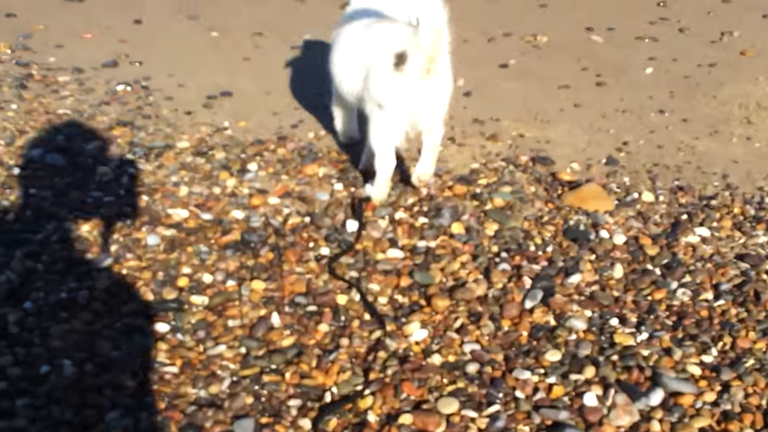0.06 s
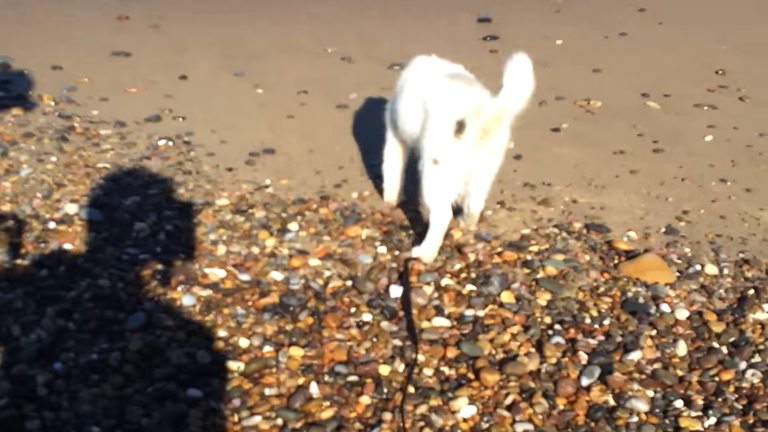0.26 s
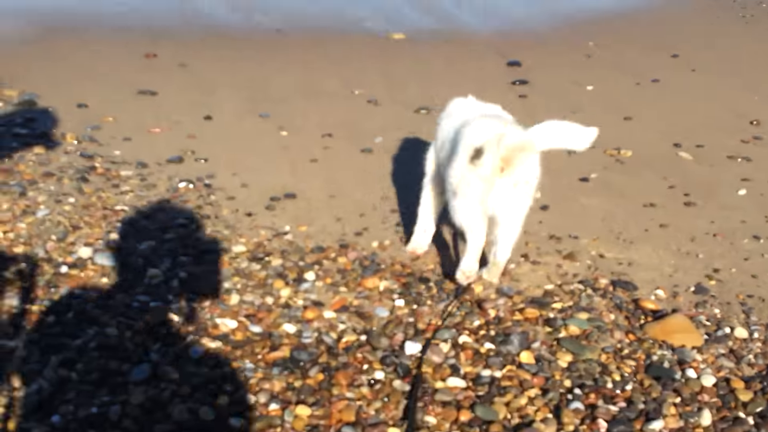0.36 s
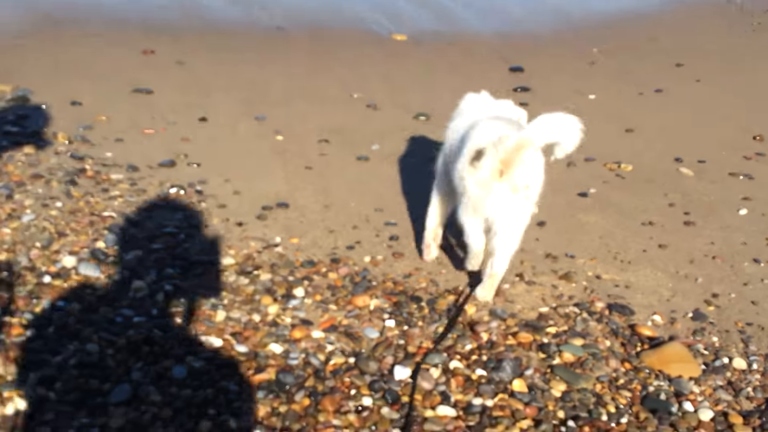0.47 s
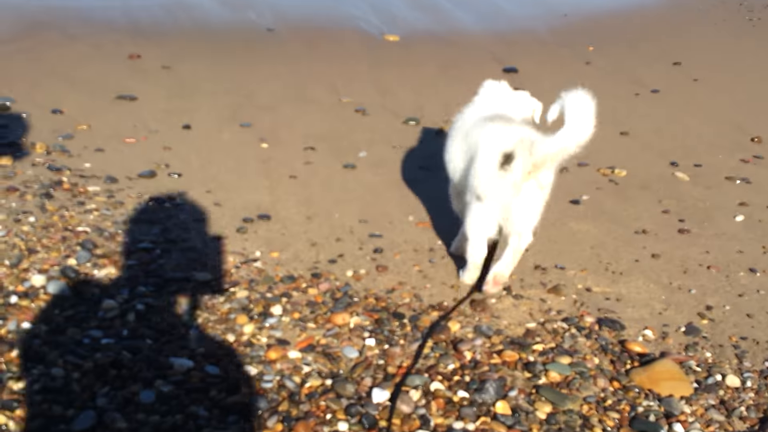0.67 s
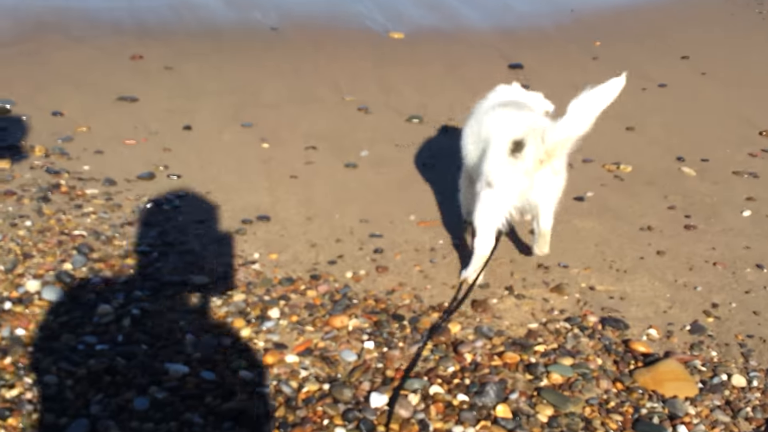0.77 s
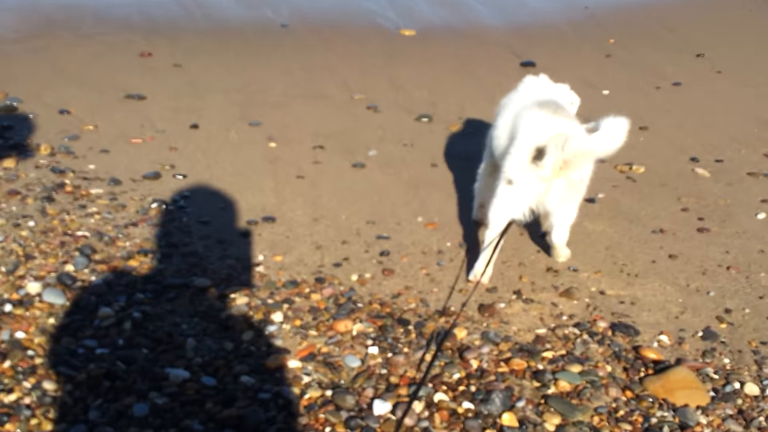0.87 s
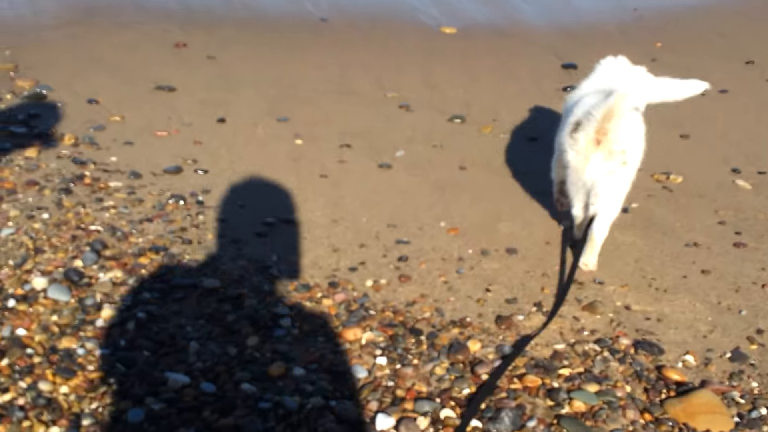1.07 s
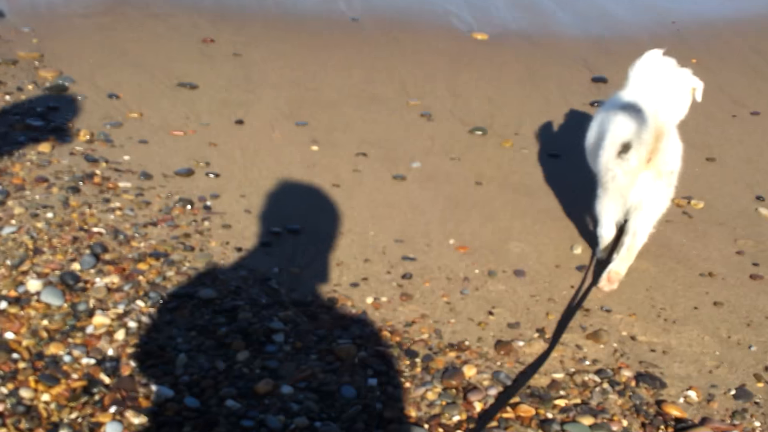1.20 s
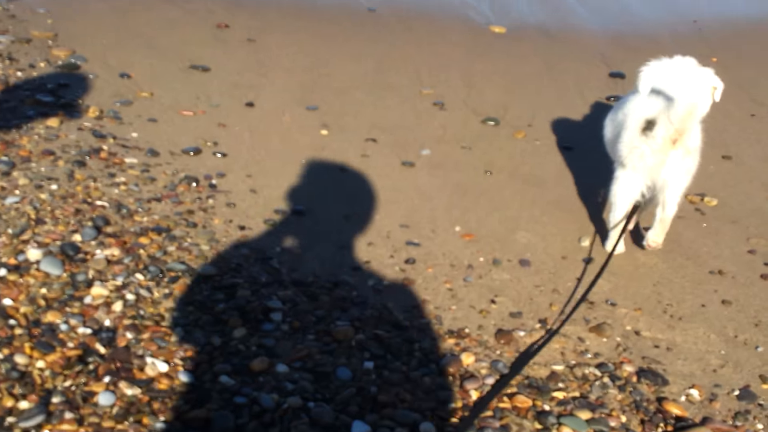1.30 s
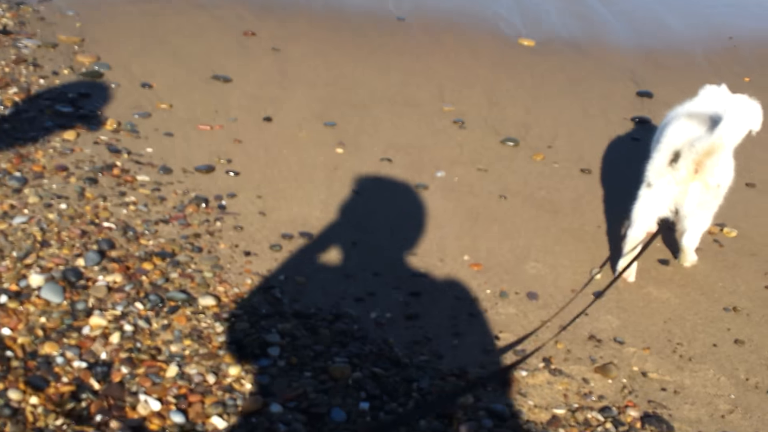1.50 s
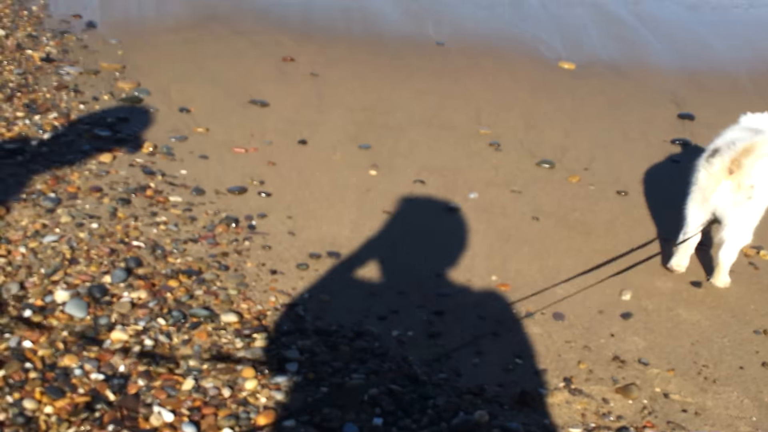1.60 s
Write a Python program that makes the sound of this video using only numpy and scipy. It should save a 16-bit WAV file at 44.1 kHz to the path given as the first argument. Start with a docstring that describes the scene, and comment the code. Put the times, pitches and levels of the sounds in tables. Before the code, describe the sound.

Pebbles crunch and clink under two close steps, over a soft wash of sea.

```python
"""Two crunching footsteps on a pebble beach, close below the listener.
Each step is a few overlapping surges of tiny stone collisions, with a dull thud as the weight lands.
Large stones clack, small pebbles clink, and a sole scuffs through grit.
Behind it the sea rumbles and fizzes, and two faint whines glide up and down."""
import sys
import numpy as np
from scipy import signal
from scipy.fft import rfft, irfft
from scipy.io import wavfile
from scipy.ndimage import uniform_filter1d

SR = 44100
rng = np.random.default_rng(int(sys.argv[2]) if len(sys.argv) > 2 else 0)


def dump_mix(stems):
    """Bounce the given channels to the path in sys.argv[1] as a 16-bit WAV at rate SR."""
    frames = np.atleast_2d(stems).T  # one column per channel
    limited = np.clip(frames, -1, 1)  # hard clip at full scale
    pcm = np.round(limited * 32767).astype(np.int16)
    wavfile.write(sys.argv[1], SR, pcm)


N = 72765
T, FREQS = np.arange(N) / SR, np.fft.rfftfreq(N, 1 / SR)


def amp(db):
    """Turns decibels into a number to multiply by."""
    return 10 ** (np.asarray(db) / 20)


def unit(x):
    """Scales a signal to an average strength (rms) of 1."""
    return x / np.sqrt(np.mean(x ** 2) + 1e-20)


def level_at(points, hz):
    """Looks up a level between the rows of a frequency table."""
    f, db = np.transpose(points)
    return np.interp(np.log(hz + 1), np.log(f + 1), db)


def add(mix, start, sound):
    """Mixes in a stereo sound at a start time in seconds."""
    part = mix[:, max(round(start * SR), 0):][:, :sound.shape[1]]
    part += sound[:, :part.shape[1]]


def colour(x, points, size=4096):
    """Gives a sound the tone in a table, with no ringing ahead of a hit."""
    log_gain = np.log(amp(level_at(points, abs(np.fft.fftfreq(size, 1 / SR)))))
    response = np.exp(np.conj(signal.hilbert(log_gain)))
    taps = np.fft.ifft(response).real[:size // 2]
    return signal.fftconvolve(x, taps[None], axes=1)[:, :x.shape[1]]


def band(x, centre_hz, width_hz):
    """Keeps one soft-edged band of a noise, at strength 1."""
    return unit(irfft(rfft(x) * np.exp(-2 * ((FREQS - centre_hz) / width_hz) ** 2), N))


def drift(hz):
    """A random wobble of strength 1, mostly slower than hz."""
    return unit(irfft(rfft(rng.standard_normal(N)) / (1 + (FREQS / hz) ** 4), N))


def surge(start, rise, hold, fade, db):
    """A loudness curve that builds, holds, then drops 20 dB every `fade` seconds."""
    build = np.clip((T - start) / rise, 0, 1)
    return amp(db) * build * 10 ** (-np.maximum(T - start - rise - hold, 0) / fade)


def grains(per_s, spread_db, right_lag_ms, jitter_ms, width, kinds=48, size=256, ring_s=0.00047):
    """An even stream of tiny collisions; each kind has its own short ring and direction."""
    t, hz = np.arange(size) / SR, np.fft.rfftfreq(size, 1 / SR)
    hits = (rng.random(N) < per_s / SR) * amp(spread_db * np.minimum(rng.exponential(1, N), 3))
    hits *= rng.choice([-1, 1], N)
    kind, out = rng.integers(0, kinds, N), np.zeros((2, N))
    apart = np.clip(width * np.sqrt(hz / hz[-1]), 0, 1)  # left and right are less alike in the highs
    for k in range(kinds):
        bursts = rng.standard_normal((2, size)) * np.exp(-t / ring_s)
        left, other = rfft(np.roll(bursts, size // 8, axis=1))
        lag_s = (right_lag_ms + jitter_ms * rng.standard_normal()) / 1000
        right = (np.sqrt(1 - apart ** 2) * left + apart * other) * np.exp(-2j * np.pi * hz * lag_s)
        out += signal.oaconvolve((hits * (kind == k))[None], irfft([left, right]), axes=1)[:, :N]
    power = uniform_filter1d((out ** 2).mean(0), size=400)
    return out / np.sqrt(power + 1e-9)


# tone of the sea's rumble, deep bass and fizz: f/Hz, level/dB
RUMBLE_TONE = [(20, -51), (80, -37), (125, -20.5), (190, -0.5), (300, 0.5), (560, 1.5), (800, -10),
               (1200, -14.5), (2500, -30), (6000, -32)]
BASS_TONE = [(20, -22), (50, -23), (80, -11), (120, 0), (170, 2), (300, -27), (1000, -56)]
FIZZ_TONE = [(80, -31), (300, -13.5), (1000, 1), (2000, 2), (2900, -1), (4000, -2.5), (5500, -2.5),
             (7500, 0), (9500, -4), (14500, -13.5)]
# how loud the low sounds are; the bass dips in the second step: t/s, rumble level/dB, bass level/dB
LOW_LEVELS = [(0, -40, -54.5), (.3, -38, -53), (0.528, -37.5, -54.5), (0.699, -40, -56),
              (.95, -41.5, -55.5), (1.0, -39.5, -72), (1.12, -37, -60), (1.24, -40, -75),
              (1.31, -40.5, -58), (1.45, -40, -58), (1.65, -38, -58)]
# how loud the fizz is, before its flicker: t/s, level/dB
FIZZ_LEVELS = [(0, -39.5), (.15, -38), (.45, -36.5), (.62, -39.5), (.8, -41), (.92, -35), (1.3, -43),
               (1.35, -36), (1.5, -37.5), (1.65, -39.5)]
# washes of water: t/s, rise/s, hold/s, fade/s, level/dB, centre f/Hz, width/Hz
WATER_WASHES = [(-.02, 0.015, 0.011, 0.2, -38, 1390, 700), (0, 0.013, 0.15, 7, -45, 724, 350),
                (1.48, 0.056, 0.058, 0.5, -41.5, 1090, 490), (1.6, .012, .008, .03, -34, 360, 140)]
def sea(alike=0.89):
    """The sea rumbles, foam and wet sand fizz, and water washes in softly."""
    left, other, wash_left, wash_right, middle, side = rng.standard_normal((6, N))
    times, rumble_db, bass_db = np.transpose(LOW_LEVELS)
    right = alike * left + np.sqrt(1 - alike ** 2) * other
    rumble = unit(colour(np.array([left, right]), RUMBLE_TONE)) * amp(np.interp(T, times, rumble_db))
    bass = unit(colour(np.array([middle + 0.38 * side, middle - 0.42 * side]), BASS_TONE))
    bass *= amp(np.interp(T, times, bass_db))
    foam = grains(per_s=6000, spread_db=3, right_lag_ms=0, jitter_ms=0.26, width=1.05)
    fizz_db = np.interp(T, *np.transpose(FIZZ_LEVELS)) + 1.5 * drift(42)
    fizz = unit(colour(foam, FIZZ_TONE)) * amp(fizz_db)
    water = np.array([wash_left, wash_right])
    washes = sum(surge(*row[:5]) * band(water, *row[5:]) for row in WATER_WASHES)
    return rumble + bass + fizz + washes


# the path of each whine, one list apiece: t/s, f/Hz, level/dB
WHINE_PATHS = [
    [(0, 898, -37), (.025, 676, -41), (.062, 603, -35), (.082, 857, -42), (.095, 900, -60)],
    [(.42, 480, -48), (.431, 580, -34), (.445, 713, -52), (.468, 835, -40), (.49, 743, -40.5),
     (.505, 641, -35), (.53, 540, -48)],
]
def whines(roughness=0.44):
    """Faint, far-off tones glide while their pitch and loudness tremble."""
    out = np.zeros(N)
    for path in WHINE_PATHS:
        times, hz, db = np.transpose(path)
        cycles = np.cumsum(np.interp(T, times, hz) * (1 + 0.019 * drift(124))) / SR
        gate = uniform_filter1d(1. * ((T > times[0]) & (T < times[-1])), size=200)
        loudness = gate * amp(np.interp(T, times, db)) * (1 + roughness * drift(110))
        out += loudness * np.sqrt(2) * np.sin(2 * np.pi * cycles)
    return out


# bright and low parts of stone hitting stone, shared by the stone sounds: f/Hz, level/dB
BRIGHT_TONE = [(100, -60), (1000, -26), (3000, -16), (5600, -3.5), (6600, 3), (7500, 3), (8800, -4.5),
               (11000, -9), (14500, -17)]
BODY_TONE = [(40, -59), (110, -39), (250, -20), (550, -6), (850, -9), (1350, 0), (2200, -2.5), (2800, -7),
             (3500, -4), (4700, -6), (6000, -22.5), (15000, -42)]
# knocks of larger stones: t/s, relative level/dB, body boost/dB
STONE_KNOCKS = [(.095, -33, 6), (0.163, -28, 2), (.242, -7.5, 9), (.329, -16.5, -2), (.344, -16, -8),
                (.366, -27, 9), (0.39, -21, 4), (.429, -25, 4), (.543, -24, 4), (.646, -34, 7),
                (.699, -30, -3), (.747, -28, -5), (.767, -24, 3), (.826, -36, 5), (.837, -31, -2),
                (.869, -19, -3), (.8915, -20, 7.5), (0.947, -24, -2), (1.006, -16, 7.5), (1.022, -18, 4),
                (1.029, -12, 3), (1.074, -14, 7), (1.208, -17, 3), (1.324, -23, 5), (1.37, -23, 1),
                (1.40, -24, 3), (1.41, -28, 1), (1.419, -16, -2), (1.467, -20, -2), (1.548, -22, 3),
                (1.561, -19.5, -12)]
def clacks(rise_s=0.0005, knock_s=0.0014, rattle_s=0.008, size=2048):
    """Larger stones knock once and rattle their neighbours."""
    t, out = np.arange(size) / SR, np.zeros((2, N))
    shape = (1 - np.exp(-t / rise_s)) * (np.exp(-t / knock_s) + 0.15 * np.exp(-t / rattle_s))
    for start, db, body_db in STONE_KNOCKS:
        bright_noise, body_noise = rng.standard_normal((2, 2, size))
        bright = unit(colour(bright_noise, BRIGHT_TONE))
        body = unit(colour(body_noise + 0.4 * body_noise[::-1], BODY_TONE))  # blends left and right
        add(out, start, amp(db - 6) * shape * (bright + amp(body_db - 2) * body))
    return out


# surges of crunch in each step: t/s, rise/s, hold/s, fade/s, relative level/dB, body boost/dB
FIRST_CRUNCH = [(.198, 0.01, .011, 0.0049, -20, 0), (.222, 0.0046, 0.0066, 0.02, -18.5, 1),
                (.239, 0.014, 0.023, 0.0322, -14, 1), (.31, 0.022, 0.047, 0.26, -36, -0.5)]
SECOND_CRUNCH = [(.935, 0.014, 0.036, 0.028, -32, 4.5), (.977, .048, 0.015, 0.028, -18, -1),
                 (1.047, .018, 0.015, 0.041, -18, 0), (1.11, 0.028, 0.052, 0.048, -35.5, -2.5),
                 (1.185, 0.024, 0.077, 0.018, -32.5, 3), (1.385, .02, 0.022, .12, -38.5, 0)]
def footstep(surges, right_lag_ms, per_s=4500, spread_db=3):
    """The shoe presses the pebbles in surges: small stones crackle, large ones knock lower."""
    small = grains(per_s, spread_db, right_lag_ms, jitter_ms=0.029, width=1.0)
    large = grains(per_s, spread_db, right_lag_ms, jitter_ms=0.051, width=2.3)
    bright = unit(colour(small, BRIGHT_TONE))
    body = unit(colour(large + 0.46 * small, BODY_TONE))
    return amp(-2) * sum(surge(*row[:5]) * (bright + amp(row[5] - 2) * body) for row in surges)


def with_echoes(x, level_db=-7.5, decay_s=0.0083, count=24, size=1500):
    """The pebbles and the walker's legs bounce back faint, very quick echoes."""
    delays = rng.integers(60, size, (2, count))
    echoes = np.zeros((2, size))
    strengths = rng.choice([-1, 1], delays.shape) * np.exp(-delays / SR / decay_s)
    np.put_along_axis(echoes, delays, strengths, 1)
    echoes /= np.linalg.norm(echoes, axis=1, keepdims=True)
    return x + amp(level_db) * signal.fftconvolve(x, echoes, axes=1)[:, :N]


# the foot's weight landing: t/s, rise/s, hold/s, fade/s, level/dB, centre f/Hz, width/Hz
HEEL_THUDS = [(.2, .005, .008, .05, -31, 540, 200), (1.066, .008, .008, .025, -34, 330, 150)]
def thuds():
    """The bed of pebbles gives way under the heel with a dull thud."""
    return sum(surge(*row[:5]) * band(rng.standard_normal(N), *row[5:]) for row in HEEL_THUDS)


# bright clinks of small pebbles: t/s, relative level/dB, f/Hz
PEBBLE_CLINKS = [(.2107, -1.5, 6970), (0.218, -14, 6900), (0.2292, -4, 7450), (0.243, -10, 6960),
                 (0.2666, -4.5, 7400), (0.275, -6, 7700), (0.3448, -15.5, 6900), (.382, -17, 7400),
                 (.983, -17.5, 7900), (1.013, -17, 7160), (1.0257, -13, 7100), (1.0285, -3, 7270),
                 (1.0558, -7, 7000), (1.069, -11.5, 7300), (1.082, -16, 7250), (1.092, -11, 6980),
                 (1.102, -8.5, 7060), (1.116, -16, 7140), (1.139, -23, 7300), (1.144, -20, 7540),
                 (1.175, -13.5, 7590), (1.185, -21, 7500), (1.202, -16, 7800), (1.3464, -16.5, 7000),
                 (1.504, -23, 8100)]
def clinks(rise_s=0.00035, rattle_s=0.005, size=1024):
    """Small pebbles snap together, ring for an instant and leave a tiny rattle."""
    t, out = np.arange(size) / SR, np.zeros((2, N))
    shape = t / rise_s * np.exp(1 - t / rise_s)
    for start, db, hz in PEBBLE_CLINKS:
        phase = 0.24 * rng.uniform(0, 2 * np.pi, (2, 1))
        ring = shape * np.sin(2 * np.pi * hz * t + phase)
        rattle = colour(rng.standard_normal((2, size)) * np.exp(-t / rattle_s), BRIGHT_TONE)
        add(out, start, amp(db) * (0.76 * ring + 0.16 * rattle))
    return out


# tone of the grit: f/Hz, level/dB
GRIT_TONE = [(100, -34), (400, -13), (1400, -0.5), (2900, -18), (5000, -7), (7600, 9.5), (10000, -1.5),
             (14500, -4)]
# slides of the sole: t/s, rise/s, hold/s, fade/s, level/dB
SOLE_SLIDES = [(1.034, 0.02, 0.063, 0.16, -40.5), (1.225, .052, .012, .007, -27.5)]
def scuffs():
    """Fine grit hisses under a sliding sole."""
    grit = grains(per_s=7700, spread_db=4, right_lag_ms=0.13, jitter_ms=0.054, width=0.58)
    return unit(colour(grit, GRIT_TONE)) * sum(surge(*row) for row in SOLE_SLIDES)


def scene():
    """One foot lands straight below, the other a little to the right, with the sea behind."""
    steps = footstep(FIRST_CRUNCH, right_lag_ms=-0.033) + footstep(SECOND_CRUNCH, right_lag_ms=-0.097)
    return with_echoes(steps) + scuffs() + clacks() + clinks() + thuds() + sea() + whines()


# how much louder the left microphone opening is than the right: f/Hz, level/dB
MIC_BALANCE = [(100, 1), (350, 4.5), (700, 0.5), (1300, 6), (2100, 0.5), (2800, -3), (3600, 0),
               (4600, -0.5), (6500, 0.5), (8500, 2.5), (10000, 0.5), (13000, 5.5)]
def record(dry, ceiling=0.9, cutoff_hz=14550):
    """Each microphone opening colours the sound; the tallest peaks and the highest treble are cut."""
    tilt_db = level_at(MIC_BALANCE, FREQS) / 2
    coloured = irfft(rfft(dry) * amp([tilt_db, -tilt_db]), N)
    low_pass = signal.firwin(301, cutoff_hz, window=("kaiser", 9), fs=SR)
    return signal.oaconvolve(np.clip(coloured, -ceiling, ceiling), low_pass[None], "same")


dry = scene()
out = record(dry)
dump_mix(out)
```